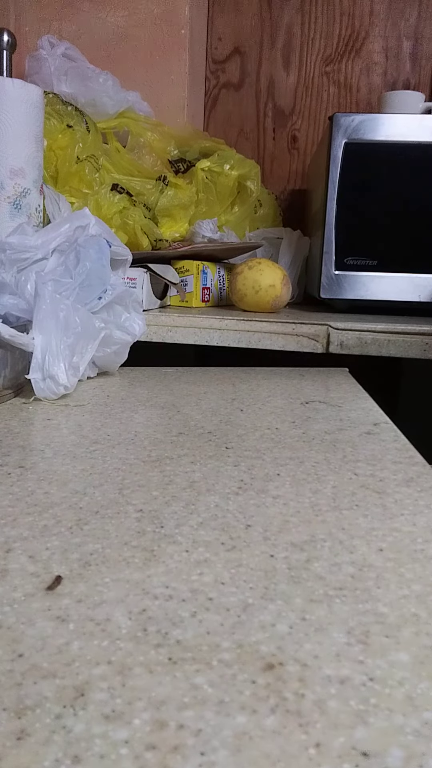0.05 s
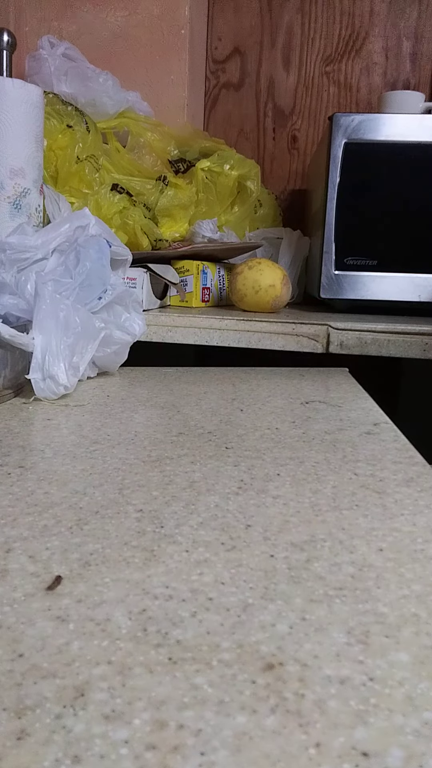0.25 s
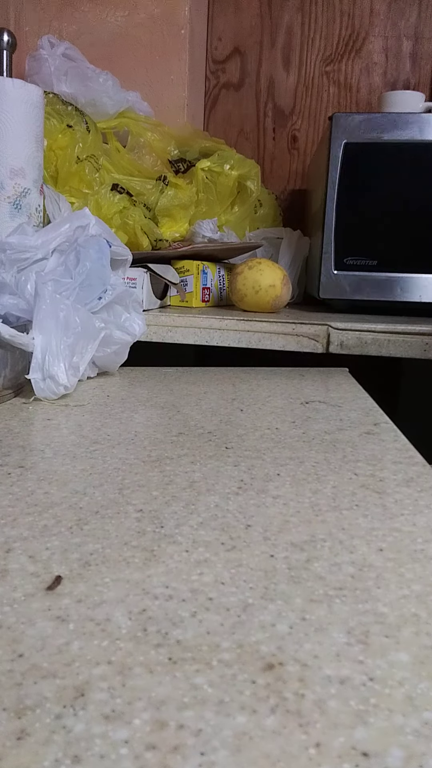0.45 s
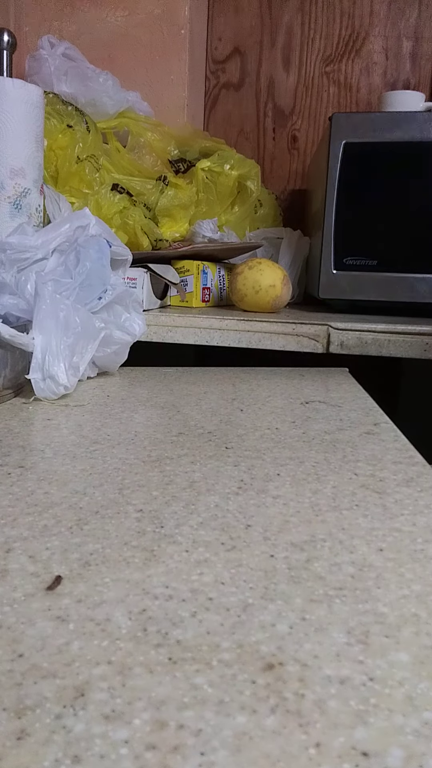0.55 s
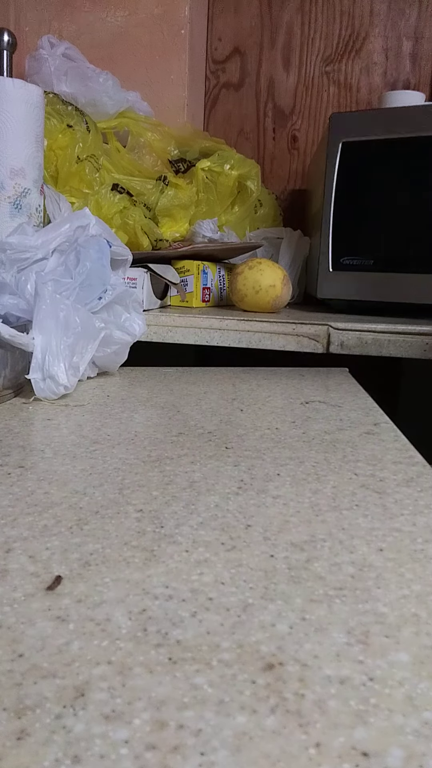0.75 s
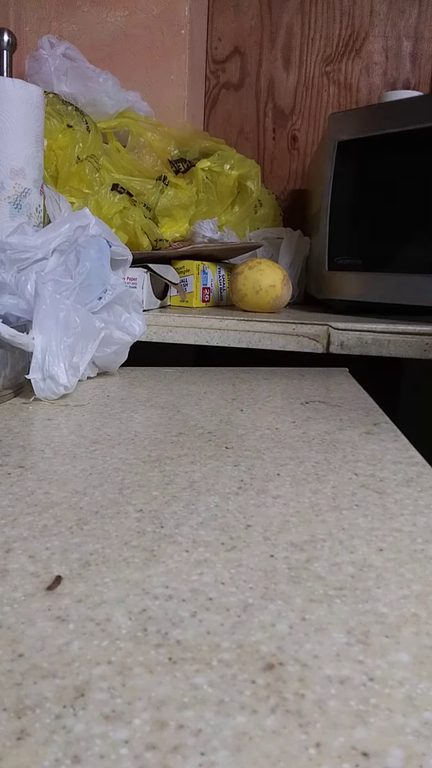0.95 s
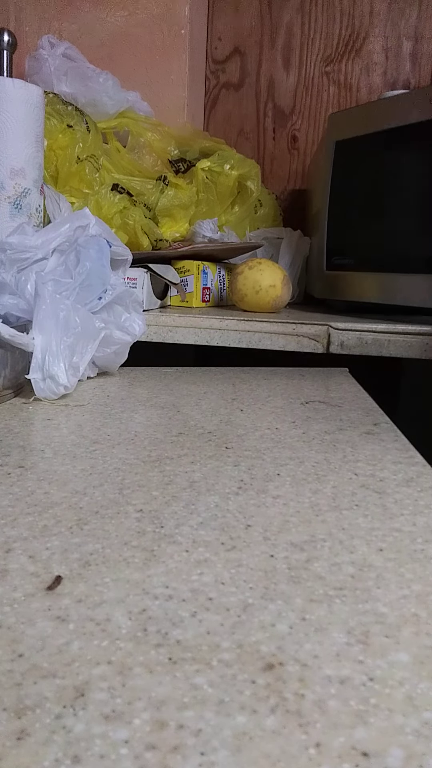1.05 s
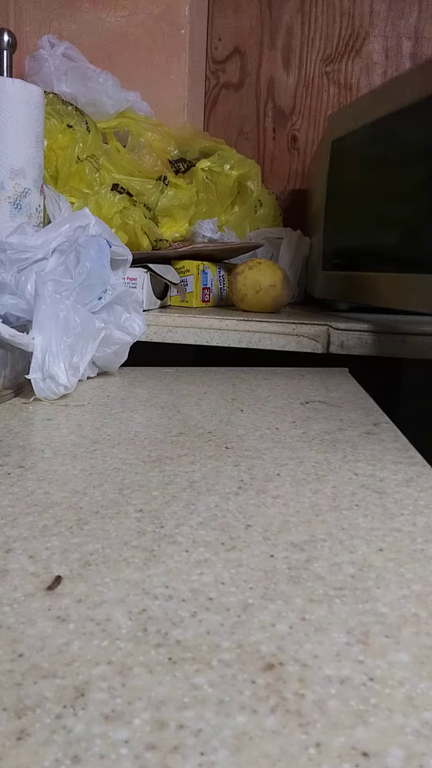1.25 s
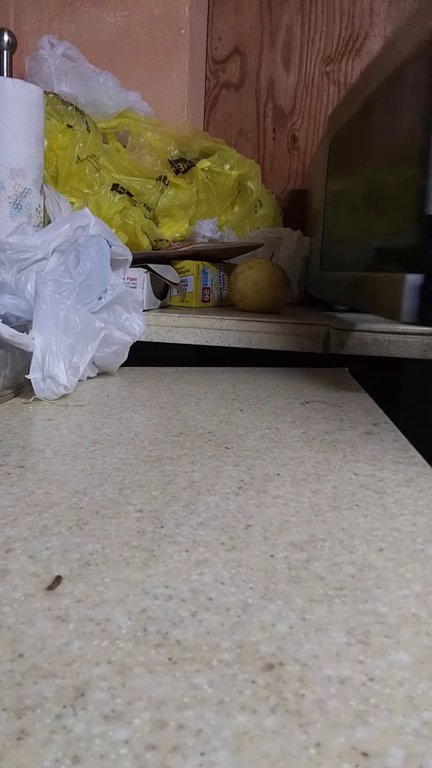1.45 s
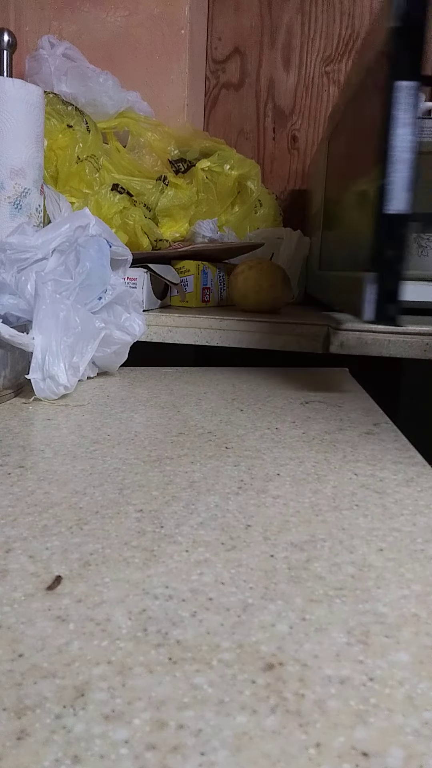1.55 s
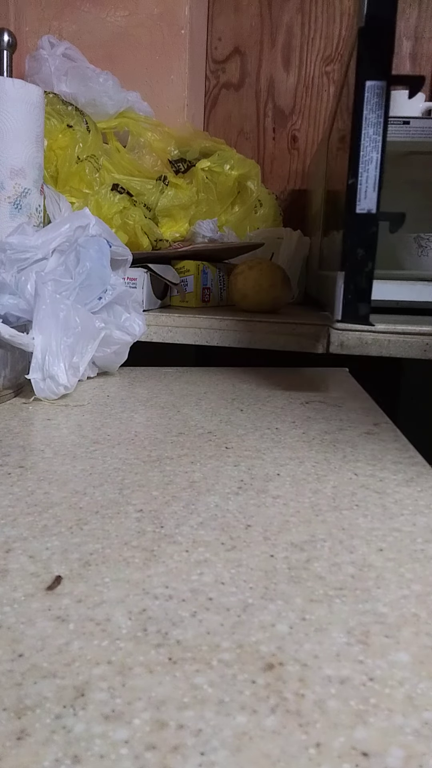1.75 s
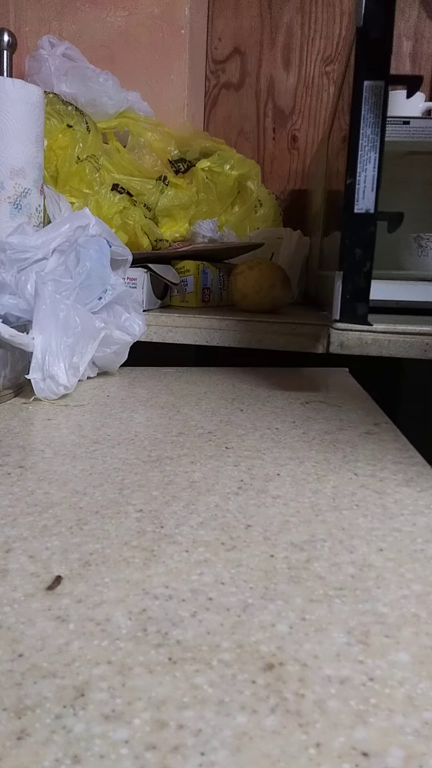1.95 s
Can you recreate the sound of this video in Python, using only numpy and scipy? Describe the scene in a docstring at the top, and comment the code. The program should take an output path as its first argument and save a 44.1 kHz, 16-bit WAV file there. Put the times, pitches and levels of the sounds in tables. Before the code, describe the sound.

Microwave oven door opening: small clicks, two hard latch clacks, then lighter rattling knocks

```python
"""In a small kitchen a microwave door is pulled open. Latch and door knock in dense, coloured noise bursts
that ring the panels; the hook's snap, the lever and the booming case are sums of decaying modes.
Spring ticks are narrow-band bursts, hook drags are resonated random slips, and hinge squeaks gliding sines.
Behind them an appliance hums and whirs in sines and narrow noise, and filtered noise gives the room's air
and a hiss that swells toward the end."""
import sys
import numpy as np
from scipy import signal
from scipy.fft import rfft, irfft
from scipy.io import wavfile

SR = 44100
rng = np.random.default_rng(int(sys.argv[2]) if len(sys.argv) > 2 else 0)


def transcribe(signal):
    """Save signal, clipped to [-1, 1], as a 16-bit WAV file at the path in sys.argv[1]."""
    frames = np.atleast_2d(signal).T
    limited = np.clip(frames, -1, 1)
    pcm = np.round(limited * 32767).astype(np.int16)
    wavfile.write(sys.argv[1], SR, pcm)


N = 88200  # two seconds
T = np.arange(N) / SR
HZ = np.maximum(np.fft.rfftfreq(8192, 1 / SR), 1)  # filter bins, kept above zero for the log axis

# Contacts of latch and door. Each row: start in seconds, level in dB, first crack in dB, reflection delay
# in seconds, rattle T60 in seconds, room tail in dB, treble in dB, top in dB, hollow resonance in Hz,
# its boost in dB, panel ring in dB; all but the level are relative to the contact.
KNOCKS = [(0.2114, -38.5, 0, 0.0033, 0.037, -2, 6, -3, 1439, 16.5, -2.5),
          (0.2181, -32.5, -7, 0.0015, 0.16, -8, -8.5, -10, 1690, 3.5, -8),
          (0.3211, -39.5, 6, .007, 0.164, 2.5, -4, 13, 1552, 9.5, -11),
          (.3696, -23, 0, 0.0035, 0.093, -10, 4, 8.5, 1236, 0.5, 0),
          (.392, -38, -11, 0.0027, 0.18, 0, 9.5, 14, 3430, 7.5, -22),
          (0.4777, -31.5, 5, 0.0018, 0.048, -9, -3, -3, 1500, -24, -7),
          (0.4833, -21.5, -7, 0.00052, 0.1, -12, -5.5, -15, 1510, 4, -9),
          (.6612, -28, -2, .003, 0.12, -5.5, 3, 1, 1760, 4.5, 0.5),
          (0.769, -29.5, 0, 0.0027, 0.1434, -8, -3, 12, 2900, 3.5, -5.5)]
# Modes of the door panels. Each row: frequency in Hz, relative level in dB, T60 in seconds.
PANELS = [(490, -14, .3), (561, -17, .26), (743, -18, .3), (868, -14, .24), (1102, -14, .22),
          (1165, -13, .2), (1275, -14, .24), (1351, -10, .22), (1498, -8, .23), (1836, -16, .3),
          (2083, -16, .25), (2378, -12, .18), (2544, -18, .16), (2847, -19, .22), (3240, -18, .2)]
# Dense ringing of plastic and sheet metal. Each row: frequency in Hz, relative density in dB per Hz.
SHELL = [(30, -71), (90, -12), (200, -11.5), (450, 0.5), (700, -1.5), (1100, 0.5), (2400, 1.5),
         (3900, -4.5), (4900, -19), (6200, -10.5), (8200, -17.5), (10500, -30), (15000, -43.5)]
TREBLE_HZ, TOP_HZ, HOLLOW_OCTAVES = 4580, 9670, 0.16
PANEL_FOCUS = 0.733  # share of the hollow's boost that the panel modes near it get


def knocks():
    """Impact excitation: each contact has its own colour and rings the panel modes near its hollow most."""
    out = np.zeros(N)
    for (s, db, crack_db, delay, rattle_t60, room_db,
         treble_db, top_db, hollow_hz, hollow_db, panel_db) in KNOCKS:
        treble = treble_db * above(TREBLE_HZ)
        top = (top_db - treble_db) * above(TOP_HZ)
        hollow = hollow_db * hump(hollow_hz, HOLLOW_OCTAVES)
        gains = from_db(at_hz(SHELL) + treble + top + hollow)
        burst = strike(gains, crack_db, delay, rattle_t60, room_db)
        focus = PANEL_FOCUS * np.interp(np.array(PANELS)[:, :1], HZ, hollow)
        add(out, s, from_db(db) * burst)
        add(out, s, from_db(db) * ring(PANELS, panel_db + focus, rise_s=0.00105))
    return out


CRACK_T60_S, BLOOM_RISE_S, ROOM_RISE_S = 0.03, 0.001, 0.0022  # rises are time constants


def strike(gains, crack_db, delay, rattle_t60, room_db):
    """Superposition: the direct crack, a bloom of rattle and near reflections, then the room's tail."""
    t = T[:SR // 2]
    late = np.maximum(t - delay, 0)
    crack = from_db(crack_db) * dying(t, CRACK_T60_S)
    bloom = (1 - np.exp(-late / BLOOM_RISE_S)) * dying(late, rattle_t60) * rebounds(t)
    near = np.hypot(crack, bloom) * rng.standard_normal(len(t))  # the two powers add
    room = from_db(room_db) * (1 - np.exp(-t / ROOM_RISE_S)) * room_tail(t)
    return coloured(near + room, gains)


RATTLE_PER_S, RATTLE_UNEVEN_DB = 450, 2.5  # mean rate; spread of strengths


def rebounds(t):
    """Random micro-impacts: tiny rebounds of unequal strength become an uneven gain, mean square 1."""
    times = np.cumsum(rng.exponential(1 / RATTLE_PER_S, 400))
    gain = from_db(RATTLE_UNEVEN_DB * np.clip(rng.standard_normal(len(times)), -2, 2))
    return np.interp(t, times, gain / np.sqrt(np.mean(gain ** 2)))


# Reverberation of the room. Each row: frequency in Hz, T60 in seconds.
ROOM_T60 = [(100, 1), (500, 0.62), (1500, 0.4), (3200, 0.38), (7000, 0.16), (15000, 0.063)]


def room_tail(t):
    """Diffuse reverberation: each octave of white noise dies away at the room's own rate."""
    white = rfft(rng.standard_normal(len(t)))
    hz = np.fft.rfftfreq(len(t), 1 / SR)
    tail = np.zeros(len(t))
    for centre in 125 * 2. ** np.arange(8):
        in_octave = (hz >= centre / np.sqrt(2)) * (hz < centre * np.sqrt(2))
        tail += irfft(white * in_octave, len(t)) * dying(t, at_hz(ROOM_T60, centre))
    return tail


# The hook snaps free and later strikes its stop; each hard pulse has its reflections from counter and wall.
# Each row: start in seconds, level in dB.
SNAP = [(0.3693, -9), (0.3736, -17), (0.3756, -16.5), (.4857, -14.5), (0.488, -17.5)]
# Modes of the clack. Each row: frequency in Hz, relative level in dB, T60 in seconds.
SNAP_MODES = [(490, -12, 0.0033), (1073, -1, 0.0078), (1482, 0.5, 0.0096), (2300, -33, .005)]


def snap():
    """Heavily damped modes: the spring throws the hook against the frame in a hard, dry clack."""
    out = np.zeros(N)
    clack = ring(SNAP_MODES, 0, rise_s=.0001)
    for s, db in SNAP:
        add(out, s, from_db(db) * clack)
    return out


# Modes of the release lever. Each row: frequency in Hz, relative level in dB, T60 in seconds.
LEVER = [(582, -10, 0.4), (860, -3.5, 0.32), (960, 3, 0.19), (1305, 1.5, 0.22), (2670, -6, 0.12)]
# Modes of the hook. Each row: frequency in Hz, relative level in dB, T60 in seconds.
HOOK = [(1083, -2, 0.11), (1460, -5, 0.19), (1656, 1.5, 0.168), (1880, -8, .2)]
LEVER_S, LEVER_DB = .2215, -33  # the lever takes up its slack
HOOK_S, HOOK_DB = .3218, -34.5  # the hook rides up its ramp


def latch():
    """Free vibration: lever and hook ring briefly in their own modes as the latch takes the load."""
    out = np.zeros(N)
    add(out, LEVER_S, from_db(LEVER_DB) * ring(LEVER, 0, rise_s=0.0027))
    add(out, HOOK_S, from_db(HOOK_DB) * ring(HOOK, 0, rise_s=0.00086))
    return out


# Ticks of the latch spring. Each row: start in seconds, level in dB, pitch in Hz, relative shell body
# in dB (before a common cut), relative overtone in dB.
TICKS = [(0.127, -40.5, 8180, 2.5, -27.5), (0.287, -42.5, 7780, 0, -11.5), (0.321, -51.5, 7260, -28, -11),
         (.752, -48, 7815, 13, -16)]
# Broad skirt under every tick. Each row: frequency in Hz, relative density in dB per Hz.
TICK_SKIRT = [(2000, -43), (5000, -16), (7000, -4), (8500, -19), (9500, -19.5), (15000, -29)]
TICK_OCTAVES, TICK_BLOOM_S = 0.055, 0.00577
TICK_OVERTONE = 1.43  # ratio to the pitch


def ticks():
    """Narrow resonance: the latch spring ticks thin and high, with an overtone and a little of the shell."""
    out = np.zeros(N)
    for s, db, hz, body_db, overtone_db in TICKS:
        overtone = from_db(overtone_db) * hump(hz * TICK_OVERTONE, TICK_OCTAVES)
        spring = hump(hz, TICK_OCTAVES) + overtone
        body = from_db(body_db - 6.5 + at_hz(SHELL))
        gains = spring + from_db(at_hz(TICK_SKIRT)) + body
        burst = strike(gains, crack_db=0, delay=TICK_BLOOM_S, rattle_t60=0.094, room_db=-2)
        add(out, s, from_db(db) * burst)
    return out


# Shoves that set the case booming. Each row: start in seconds, level in dB, extra level of the lowest modes in dB.
THUMPS = [(0.127, -52.5, -14), (0.228, -48.5, -2.5), (.372, -31.5, -1.5), (.390, -44.5, 14),
          (.424, -44, 15.5), (0.481, -37.5, 2.5), (0.602, -40, -6.5), (0.666, -37, -11.5),
          (0.771, -41.5, -14), (.83, -53, 3.5), (.892, -46, -8)]
# Modes of the steel case. Each row: frequency in Hz, relative level in dB, T60 in seconds.
CASE = [(92.1, -23, 0.6), (135.7, -0.5, 0.4), (163.2, -2, 0.3), (192.5, -9, 0.27), (267.1, -1, 0.2),
        (285.55, -2.5, 0.23)]


def boom():
    """Modal vibration: the case rocks on its feet and sounds its low modes."""
    out = np.zeros(N)
    lowest = np.array(CASE)[:, :1] < 220
    for s, db, low_db in THUMPS:
        add(out, s, from_db(db) * ring(CASE, low_db * lowest, rise_s=0.0017))
    return out


# Hooks sliding on their catches. Each row: start in seconds, length in seconds, level in dB, resonance in Hz.
DRAGS = [(0.341, 0.044, -42, 1970), (0.417, 0.023, -39.5, 1330), (0.744, 0.046, -44.5, 500)]
SLIPS_PER_S = 2900  # mean rate


def drags():
    """Stick-slip friction: dense random slips of plastic on plastic, resonated and left to fade."""
    out = np.zeros(N)
    for s, length, db, hz in DRAGS:
        slips = (rng.random(N) < SLIPS_PER_S / SR) * rng.standard_normal(N)
        onset = np.clip((T - s) / 0.01, 0, 1)
        release = dying(np.maximum(T - s - length, 0), t60=0.32)
        out += from_db(db) * onset * release * resonant(slips, hz, octaves=0.57)
    return out


# Faint squeaks of the hinge. Each row: start in seconds, length in seconds, start pitch in Hz,
# middle pitch in Hz, end pitch in Hz, level in dB at the middle.
SQUEAKS = [(1.438, 0.062, 7250, 9050, 10200, -74), (1.504, .11, 8500, 9100, 8550, -75),
           (1.72, .09, 11500, 11400, 11300, -78), (1.877, .08, 10600, 11300, 12300, -82.5)]
SQUEAK_WOBBLE = .008  # rms, as a fraction of the pitch


def squeaks():
    """Frequency modulation: thin, unsteady whistles glide as the door swings."""
    out = np.zeros(N)
    for s, length, first_hz, middle_hz, last_hz, db in SQUEAKS:
        u = np.linspace(0, 1, int(length * SR))
        parabola = np.polyfit([0, .5, 1], [first_hz, middle_hz, last_hz], 2)
        wobble = SQUEAK_WOBBLE * resonant(rng.standard_normal(len(u)), 150, 0.91)
        hz = np.polyval(parabola, u) * (1 + wobble)
        whistle = np.sin(2 * np.pi * np.cumsum(hz) / SR)
        add(out, s, from_db(db) * np.sqrt(2) * np.sin(np.pi * u) * whistle)
    return out


# Spectrum of the hiss. Each row: frequency in Hz, relative density in dB per Hz.
HISS = [(100, -32), (350, -12.5), (700, -1.5), (1350, 2.5), (2000, -4), (2650, 2.5), (4000, -8),
        (4900, -16), (6000, -10.5), (9000, -19.5), (15500, -28)]
# Course of the hiss. Each row: time in seconds, rms level in dB.
HISS_LEVEL = [(0, -65), (.9, -63.5), (1.2, -66), (1.42, -61), (1.56, -54), (1.75, -57.5), (1.9, -54.5),
              (1.95, -51.5), (2.0, -53)]


def swelling_hiss():
    """Broadband noise under a slow envelope: the hiss swells toward the end."""
    return level(HISS_LEVEL) * noise(at_hz(HISS))


# Tones of the appliance. Each row: frequency in Hz, rms level in dB.
HUM = [(479, -70), (958, -74.5), (1562, -69.5), (2279, -67)]


def appliance_hum():
    """Line spectrum: the hum is a sum of steady sines in random phase."""
    out = np.zeros(N)
    for hz, db in HUM:
        out += from_db(db) * np.sqrt(2) * np.sin(2 * np.pi * (hz * T + rng.random()))
    return out


# Course of the whir. Each row: time in seconds, rms level in dB.
WHIR_LEVEL = [(0, -61.5), (1.1, -68), (1.33, -60), (1.65, -63.5), (2.0, -62)]
WHIR_HZ, WHIR_OCTAVES = 1593, 0.123


def appliance_whir():
    """Narrow-band noise: one resonance picks the whir out of white noise."""
    return level(WHIR_LEVEL) * resonant(rng.standard_normal(N), WHIR_HZ, WHIR_OCTAVES)


OLD_ECHO_DB, OLD_ECHO_T60_S = -46.5, 0.3


def fading_echo():
    """Exponential decay: shell-coloured noise, as of an earlier knock still dying in the room."""
    tail = noise(at_hz(SHELL) - 6 * above(TREBLE_HZ))
    return from_db(OLD_ECHO_DB) * dying(T, OLD_ECHO_T60_S) * tail


# Spectrum of the room air. Each row: frequency in Hz, relative density in dB per Hz.
AIR = [(25, -66), (60, -6), (160, -5), (280, -0.5), (600, -10), (1000, -5.5), (1900, -11), (2400, -6),
       (3700, -16.5), (4900, -29), (6400, -22), (9000, -25), (15500, -30.5)]
AIR_DB = -59  # rms


def room_air():
    """Stationary noise: the air of the room has a fixed spectrum and level."""
    return from_db(AIR_DB) * noise(at_hz(AIR))


def background():
    """Superposition of independent sources: air, hiss, echo, whir and hum."""
    return room_air() + swelling_hiss() + fading_echo() + appliance_whir() + appliance_hum()


MODE_SCATTER_DB = 1


def ring(modes, extra_db, rise_s):
    """Modal synthesis: struck modes of alternating sign, their strengths scattered anew at each call."""
    hz, db, t60 = np.transpose(modes)[:, :, None]
    t = T[:SR * 3 // 4]
    gain = from_db(db + extra_db + MODE_SCATTER_DB * rng.standard_normal(hz.shape))
    sign = (-1) ** np.arange(len(hz))[:, None]
    partials = sign * gain * dying(t, t60) * np.sin(2 * np.pi * hz * t)
    return partials.sum(0) * (1 - np.exp(-t / rise_s))


def coloured(x, gains):
    """Minimum-phase filtering by the folded cepstrum: causal, and white noise keeps its rms."""
    cepstrum = irfft(np.log(gains + 1e-6))
    cepstrum[1:len(HZ) - 1] *= 2
    cepstrum[len(HZ):] = 0
    response = irfft(np.exp(rfft(cepstrum)))
    return signal.fftconvolve(x, response / np.linalg.norm(response))[:len(x)]


def noise(db):
    """Spectral shaping: steady noise with these band levels, rms 1."""
    return coloured(rng.standard_normal(N), from_db(db))


def resonant(x, hz, octaves):
    """Band-pass resonance reaching this many octaves either side of its centre; rms 1."""
    band = [hz / 2 ** octaves, min(hz * 2 ** octaves, SR / 2 - 1)]
    sos = signal.butter(2, band, "band", fs=SR, output="sos")
    y = signal.sosfilt(sos, x + 1e-18)
    return y / (y.std() + 1e-12)


def from_db(db):
    """Logarithmic level: decibels to amplitude gain."""
    return 10 ** (np.asarray(db) / 20)


def at_hz(points, hz=HZ):
    """Logarithmic pitch axis: a table over frequency, interpolated along log frequency."""
    table_hz, value = np.transpose(points)
    return np.interp(np.log(hz), np.log(table_hz), value)


def level(points):
    """Amplitude envelope: gain over time from points in seconds and dB."""
    return from_db(np.interp(T, *np.transpose(points)))


def dying(t, t60):
    """Exponential decay from t = 0, falling 60 dB in t60 seconds."""
    return (t >= 0) * from_db(-60 * np.maximum(t, 0) / t60)


def hump(hz, octaves):
    """Resonance curve: a Gaussian bell over log frequency, height 1."""
    return np.exp(-.5 * (np.log2(HZ / hz) / octaves) ** 2)


def above(hz):
    """Shelf curve: a soft step over frequency, tending to 0 below hz and 1 above."""
    return 1 / (1 + (hz / HZ) ** 8)


def add(out, s, sound):
    """Linear superposition: mix a sound in from time s in seconds."""
    i = int(s * SR)
    out[i:i + len(sound)] += sound[:N - i]


def scene():
    """Superposition of all sources at one microphone on the counter."""
    opening = knocks() + snap() + latch() + ticks() + boom() + drags() + squeaks()
    return (opening + background())[None]


CUTOFF_HZ = 15900


def record(dry):
    """Band limiting: the microphone thins the deep bass; the top is cut steeply."""
    bass_cut = signal.butter(2, 35, "high", fs=SR, output="sos")
    top_cut = signal.ellip(10, .2, 70, CUTOFF_HZ, fs=SR, output="sos")
    thin = signal.sosfilt(bass_cut, dry)
    return signal.sosfilt(top_cut, thin)


dry = scene()
out = record(dry)
transcribe(out)
```